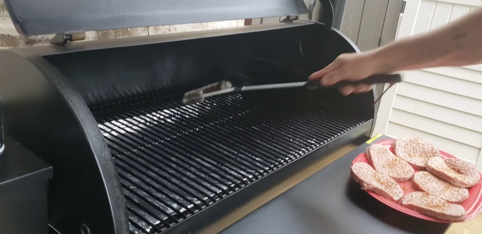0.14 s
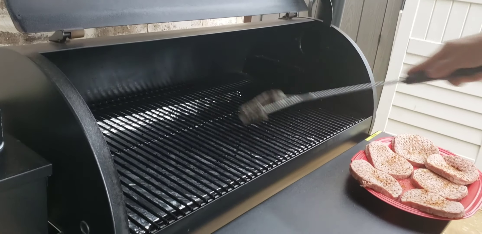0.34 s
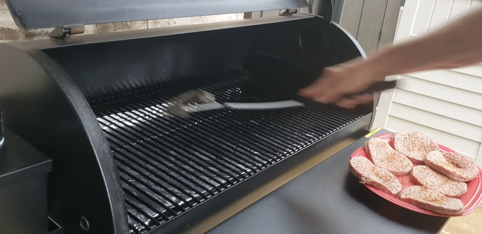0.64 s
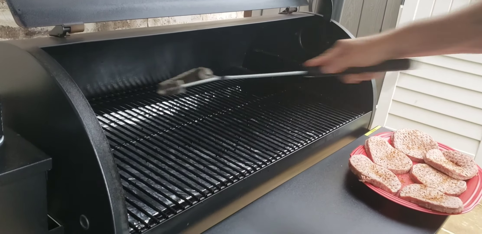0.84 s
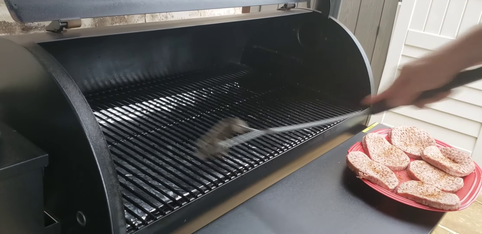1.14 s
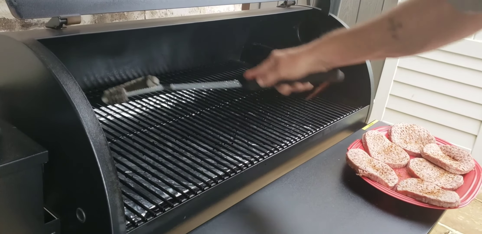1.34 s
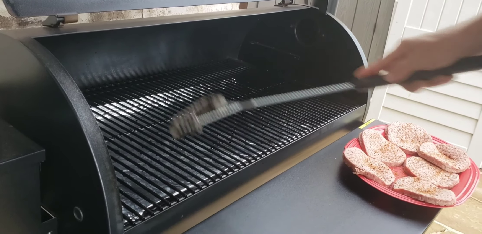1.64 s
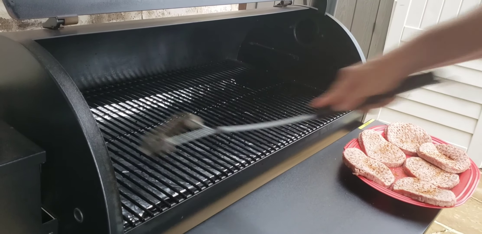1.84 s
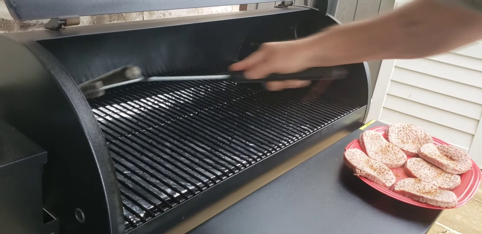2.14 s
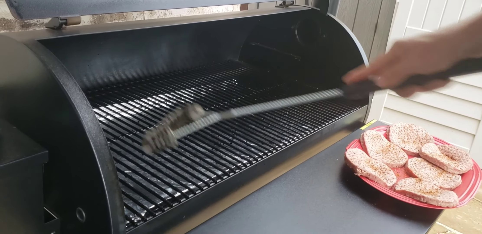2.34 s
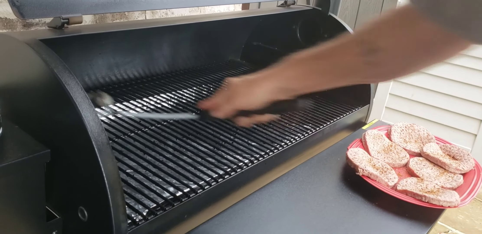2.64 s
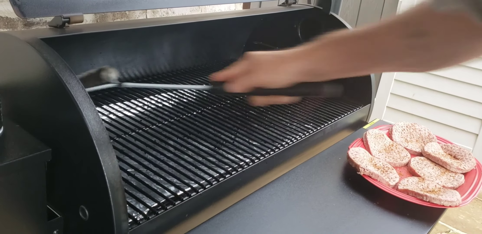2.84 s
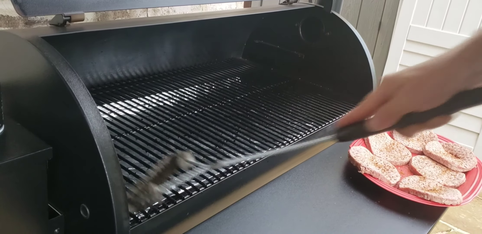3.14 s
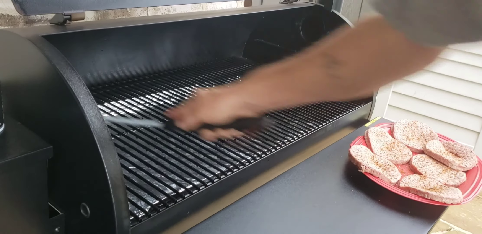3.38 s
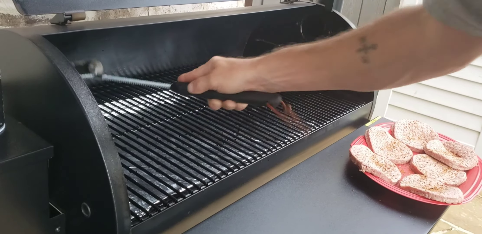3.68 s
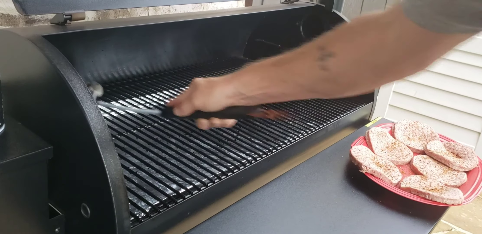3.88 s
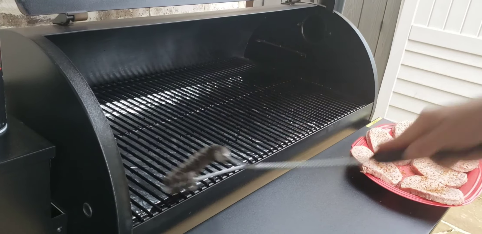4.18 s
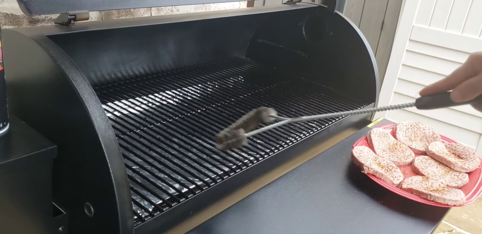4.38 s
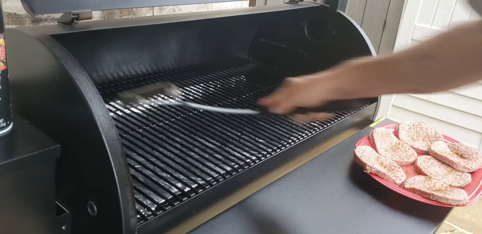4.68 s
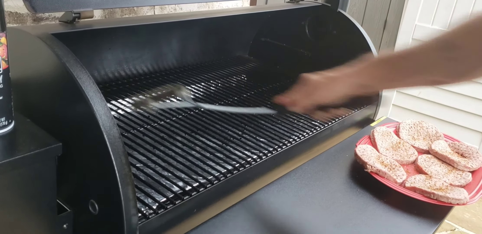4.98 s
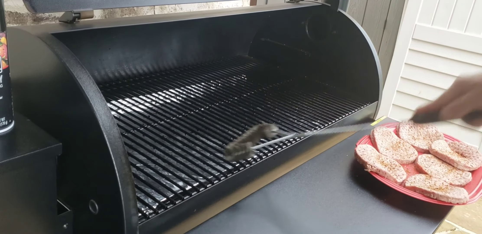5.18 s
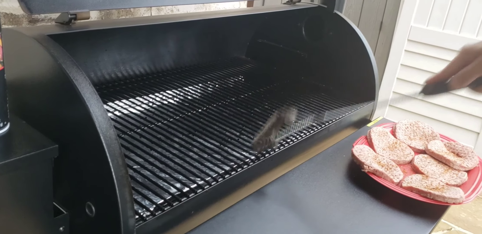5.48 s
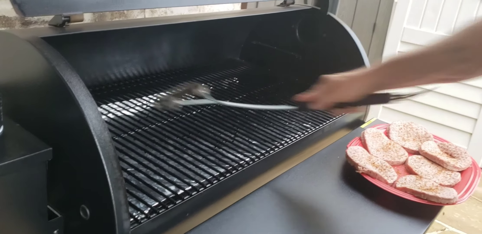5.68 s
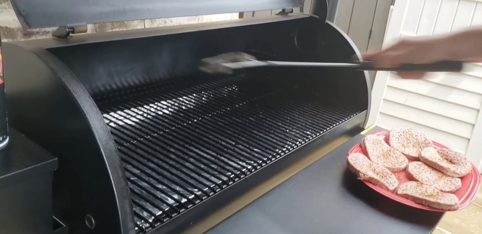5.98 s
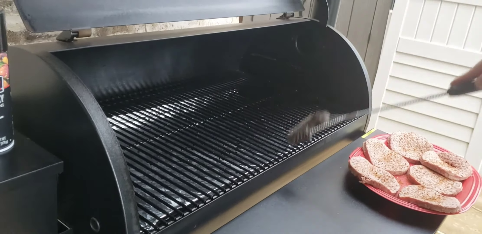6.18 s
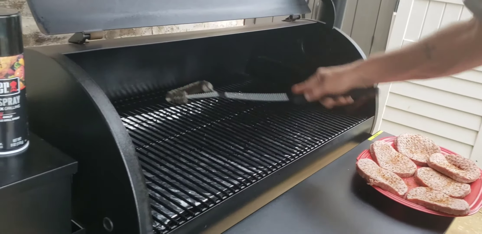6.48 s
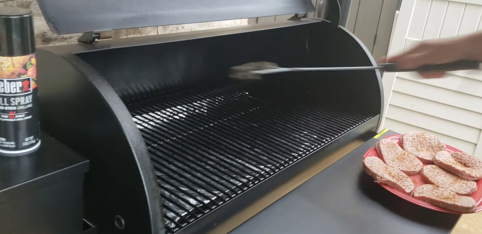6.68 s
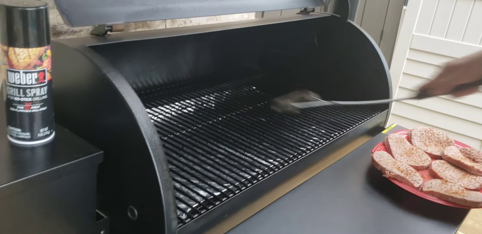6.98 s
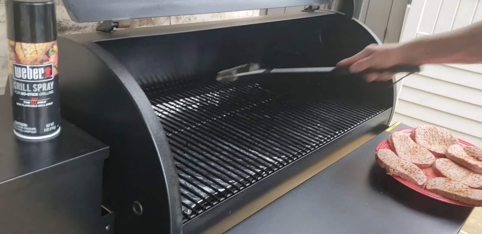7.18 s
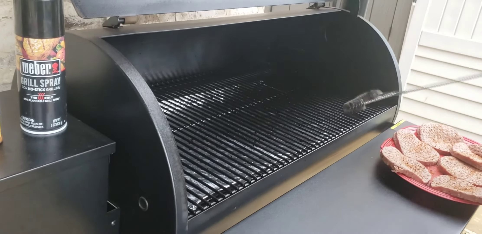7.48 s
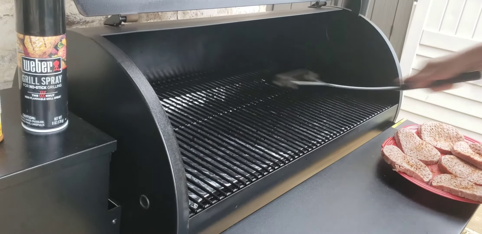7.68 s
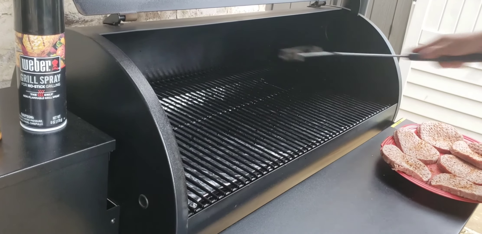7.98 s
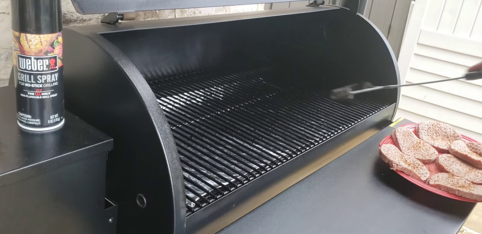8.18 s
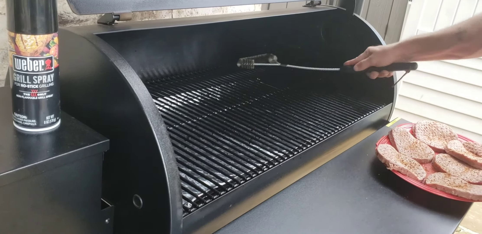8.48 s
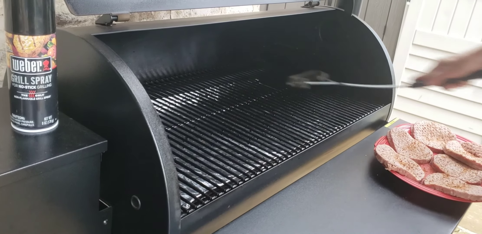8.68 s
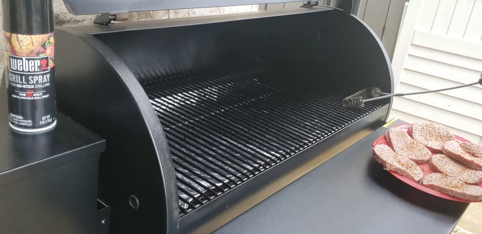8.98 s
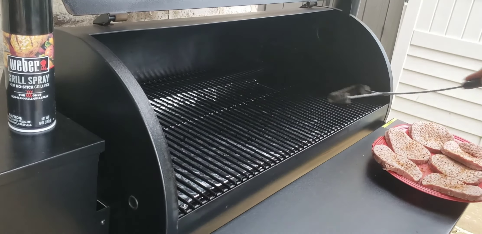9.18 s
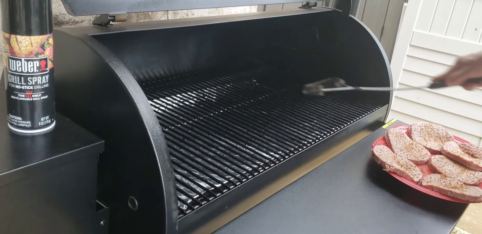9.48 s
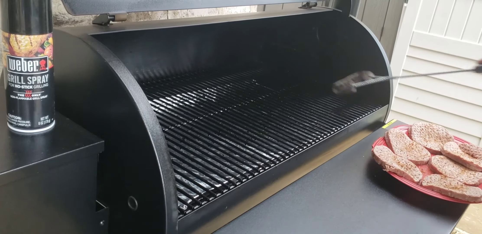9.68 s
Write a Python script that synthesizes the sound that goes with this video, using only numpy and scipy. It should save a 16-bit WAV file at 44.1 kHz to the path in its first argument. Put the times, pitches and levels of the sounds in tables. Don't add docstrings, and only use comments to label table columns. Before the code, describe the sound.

A continuous deep, hollow blower hum with soft gusts lies under repeated wire brushing on metal bars. Each stroke begins with a rattle or sharp clank, swells into a thin, gritty hiss and fades. The hardest clanks come around four and a half and five and a half seconds; later strokes are lighter and duller. Close stereo phone pickup, outdoors, low shared and wide metallic treble.

```python
import sys
import numpy as np
from scipy import signal
from scipy.fft import rfft, irfft, next_fast_len
from scipy.io import wavfile
from scipy.ndimage import uniform_filter1d

SR = 44100
rng = np.random.default_rng(int(sys.argv[2]) if len(sys.argv) > 2 else 0)


def volts_from_decibels(level):
    exponent = np.asarray(level, float) / 20
    return 10 ** exponent


def dump_mix(stems):
    frames = np.atleast_2d(stems).T
    limited = np.clip(frames, -1, 1)
    pcm = np.round(limited * 32767).astype(np.int16)
    wavfile.write(sys.argv[1], SR, pcm)


N = 433503
M = next_fast_len(N + SR // 4)
HZ = np.maximum(np.fft.rfftfreq(M, 1 / SR), 1)
T = np.arange(M) / SR

# pitch_hz, level_db
ROAR_COLOUR = [(25, -38), (45, -31.5), (90, -16.5), (160, -13), (300, -12.5), (400, -20), (600, -22.5),
               (1200, -25), (1650, -27.5), (1850, -32.5), (3200, -40.5), (5400, -45), (8000, -53),
               (9800, -60), (16000, -49)]
# pitch_hz, width_hz, level_over_roar_db
BARREL_HUMS = [(61, 13.6, 12), (119.5, 9.35, 16), (130.1, 10.4, 13.5), (204.4, 43, 4), (239.6, 20, 3),
               (310.3, 17, 6), (458.2, 26, 18), (679, 17, 4), (870, 13, 2.5), (1025, 7.1, -10),
               (1162.6, 5.8, 11), (1528, 45, 10.5), (1950, 38, 6.5), (2136, 32, 9)]
# time_s, level_db
DRAUGHT_LEVELS = [(0.0, -40), (0.13, -48), (0.19, -57), (0.41, -57), (1.45, -49), (2.63, -45), (2.82, -44),
                  (2.93, -34), (2.98, -44), (6.24, -43.5), (6.38, -57), (7.09, -47), (7.56, -57),
                  (7.64, -42.5), (9.31, -48), (9.42, -35), (9.53, -41), (9.83, -51)]
# start_s, peak_db, low_bars_db, barrel_drum_db, rattle_length_s
LANDINGS = [(0.4154, -20, 5.5, -4, 0.031), (0.465, -35, 7, 16, 0.025), (0.571, -22.5, 3, -1, 0.026),
            (1.027, -23, 0, -6, 0.04), (1.038, -15, 0, 0, 0.029), (1.087, -19.5, 2.5, -14, 0.025),
            (1.688, -28.5, 5.5, 7, 0.092), (2.402, -24, 0.5, 1, 0.053), (3.084, -32.5, 7, -23, 0.068),
            (3.707, -33, 3, 7, 0.093), (4.416, -25.5, 7.5, -15, 0.037), (4.436, -11, -4, -4, 0.02),
            (5.4387, -14.5, 3.5, -8, 0.048), (5.462, -9, -4, -19, 0.035), (5.54, -28, 7, 3, 0.049),
            (6.163, -22, 3.5, -19, 0.049), (6.186, -18, 0.5, -2.5, 0.059), (6.347, -27, 5.5, -6, 0.075),
            (6.8169, -20, 2, 0.5, 0.026), (6.866, -20.5, 3, -11, 0.035), (6.975, -29.5, 8.5, 4, 0.066),
            (7.629, -14.5, -1, -1, 0.046), (8.242, -30.5, 7, 8, 0.03), (8.275, -22, 4.5, -5, 0.021)]
# pitch_hz, width_hz, level_db
THIN_BARS = [(2150, 140, 0), (2366, 74, 1.5), (2570, 34, 0), (2836, 29, 4.5), (3090, 44, 2.5),
             (3830, 92, -29), (4520, 75, -4), (5320, 33, 0), (5490, 60, 6), (5900, 37, 0), (5920, 30, 10),
             (7360, 55, -5)]
# pitch_hz, width_hz, level_db
HEAVY_BARS = [(279, 23, -2), (323, 31, 1), (368, 18.4, 0), (555, 57, -2.5), (653, 16, -5.5),
              (765, 18.5, -4), (954, 32, -3), (1360, 9.3, -4)]
# pitch_hz, level_db
CLANG_COLOUR = [(710, -4), (1200, 8.5), (1520, 2.5), (3140, -0.5), (5340, -13), (6530, -21), (7600, -23),
                (9000, -61), (11700, -66), (19800, -120)]
# start_s, pitch_hz, peak_db, fade_60db_s
CLINKS = [
    (1.044, 5300, -27, 0.0033),
    (1.716, 2470, -32, .008),
    (2.402, 3260, -37, 0.016),
    (3.1, 3000, -37, .012),
    (3.728, 3200, -39, .012),
    (4.585, 2470, -31, 0.0041),
    (7.634, 2360, -24, .015),
    (7.665, 3030, -36, .02),
    (8.276, 2330, -25, .015),
    (8.649, 12250, -40, .05),
]
# touch_s, fastest_s, lift_s, splay_on_touching_db, slide_at_full_speed_db
STROKES = [(0.0, 0.045, 0.066, -41, -52), (.407, 0.584, 0.75, -54, -45.5), (1.009, 1.04, 1.09, -46, -39.5),
           (1.09, 1.21, 1.33, -49, -46), (1.58, 1.594, 1.66, -62, -54), (1.68, 1.853, 2.03, -42.5, -47),
           (2.39, 2.55, 2.78, -44, -49), (3.08, 3.23, 3.45, -43, -49.5), (3.318, 3.39, 3.6, -58, -51.5),
           (3.732, 4.01, 4.32, -47, -47), (4.414, 4.586, 4.85, -42, -46), (4.796, 5.02, 5.27, -60, -47.5),
           (5.431, 5.491, 6.2, -47, -52), (5.51, 5.65, 5.73, -52, -48.5), (5.66, 5.76, 5.3, -56, -58),
           (6.16, 6.35, 6.52, -54, -46), (6.64, 6.7, 6.77, -70, -56), (6.805, 7, 7.13, -51, -46),
           (7.428, 7.65, 7.83, -60, -47), (8.1, 8.277, 8.63, -64, -49.5), (8.45, 8.647, 8.95, -66, -47),
           (8.96, 9.007, 10, -59, -61), (9.07, 9.35, 9.7, -69, -53.5), (9.735, 9.759, 9.95, -60, -54)]
# start_s, peak_db, head_share_db, ring_share_db
CATCHES = [(0.0024, -29, 0.5, 1), (0.033, -36, -6, -6), (0.1905, -43, -5, -11), (0.407, -45, -4, -6),
           (0.588, -25.5, -4, -6), (0.635, -28, -10, -6), (0.9393, -38, -11, -6), (1.0136, -38, -5, -8),
           (1.1982, -34, -7, -6), (1.5953, -41, -3, -6), (1.6851, -38, -14, -6), (2.0946, -41.5, -3, -6),
           (2.3955, -37, -9, -3), (3.0844, -38, -13, -6), (3.4017, -32, -10, -9), (3.7204, -32, -6, -3),
           (4.3984, -39, -3, 0), (4.7486, -37.5, -2, -10), (5.4415, -30, 3.5, -9), (5.478, -25, 3.5, -11),
           (6.1709, -36, -15, -4), (6.3405, -27, -16, -6), (6.8074, -39, -15, -4), (7.0683, -39, -13, -1),
           (7.429, -38, -19, 8), (8.056, -35.5, -10, -8), (8.254, -24, -16, -9), (8.6492, -43, -17, -2),
           (9.6444, -51, 11, 7), (9.7507, -46, -16, -8)]
# pitch_hz, level_db
HISS_COLOUR = [(3530, -39), (6000, -17), (7460, -1.5), (8570, -13), (9940, -6.5), (11900, 1), (13400, -1.5),
               (15100, 4.5), (16000, -9)]
# pitch_hz, width_hz, level_db
WIRE_LENGTHS = [(7360, 220, -8.5), (9460, 420, -8.5), (11940, 140, -5), (12250, 130, -3.5),
                (14500, 200, -7), (14650, 220, -6), (15250, 300, -2)]
# pitch_hz, likeness_0_to_1
SIDE_LIKENESS = [(60, 1), (130, 0.98), (290, 1), (640, 0.89), (1410, 0.32), (3100, 0.15), (6820, -0.0),
                 (15000, -0.0)]
# pitch_hz, left_minus_right_db
SIDE_BALANCE = [(60, 2), (110, 0.5), (200, 2), (380, -2.5), (700, -1), (1290, 4), (2380, -3.5),
                (4400, -10.5), (8120, -4.5), (15000, 2.5)]
# pitch_hz, share_0_to_1
WALL_SHARES = [(400, 0.48), (900, 0.57), (2000, 0.026), (5000, 0.043), (12000, 0.01)]

ROAR_DB = -27
RUMBLE_FOLLOW, BOOM_FOLLOW, BOOM_SAG_DB_PER_S = 0.9, 0.099, 0.24
RATTLE_T60_S, T60_S_PER_DB = 0.26, 0.01
BRIGHT_FADE_DB_PER_S = 0.2
SPLAY_DB_PER_S, START_DB, LIFT_DB = 260, 15, 26
SPEED_UP, SLOW_DOWN = 0.87, 1.3
HEAD_DB, HEAD_FOLLOW, BAR_DB, BAR_FOLLOW = -52, 0.4, -48, 0.5
HEAD_FADE_DB_PER_S = 0.5
CATCH_T60_S = 0.14
WALL_LAG_S, PORT_LAG_S, TOP_HZ = 0.0008, 0.0001, 15800


def unit(x):
    return x / np.sqrt(np.mean(x ** 2))


def read(table):
    hz, value = np.transpose(table)
    return np.interp(np.log(HZ), np.log(np.maximum(hz, 1)), value)


def modes(table):
    return sum(volts_from_decibels(db) * 1j * HZ * w / (hz ** 2 - HZ ** 2 + 1j * HZ * w) for hz, w, db in table)


def shape(x, response):
    return rfft(x) * response / np.sqrt(np.mean(np.abs(response) ** 2))


def walk(rate):
    k = int(SR / rate)
    levels = np.repeat(rng.standard_normal(M // 200), k)[:M]
    return unit(uniform_filter1d(uniform_filter1d(levels, k), k))


def grains(rate, spread_db):
    chance = rng.random((2, 2, M), dtype=np.float32)
    size = (np.abs(2 * chance[1] - 1) + 1 / 300) ** (-spread_db * np.log(10) / 20)
    return unit((chance[0] < rate / SR) * np.sign(chance[1] - 0.5) * size)


def bursts(s, db, hold, t60, rise):
    power, t = np.zeros(M + SR), T[:SR // 3]
    for start, peak_db, length, fall in np.broadcast(s, db, hold, t60):
        k = int(max(start, 0) * SR)
        fade = volts_from_decibels(peak_db - 60 * np.clip(t - length, 0, 1) / max(fall, 0.01))
        power[k:k + len(t)] += (np.clip(t / rise, 0, 1) * fade) ** 2
    return np.sqrt(power[:M])


def roar():
    colour = volts_from_decibels(read(ROAR_COLOUR)) * np.sqrt(1 + np.abs(modes(BARREL_HUMS)) ** 2)
    air = rfft(rng.standard_normal((2, M))) * colour
    s, db = np.transpose(DRAUGHT_LEVELS)
    draught_db = np.interp(T, s, db - np.mean(db))
    rumble_db = RUMBLE_FOLLOW * draught_db
    boom_db = BOOM_FOLLOW * draught_db - BOOM_SAG_DB_PER_S * (T - T.mean())
    out = 0
    for hz, gust_db in zip((35, 130, 500, 2000, 8000), (rumble_db, boom_db, 0, 0, 0)):
        band = np.cos(np.pi / 4 * np.clip(np.log2(HZ / hz), -2, 2)) ** 2
        out = out + volts_from_decibels(gust_db + 0.8 * walk(6)) * irfft(air * band, M)
    return rfft(volts_from_decibels(ROAR_DB) * unit(out))


def panel_buzz(s, db):
    phase = 2 * np.pi * 114 * T + 0.86 * walk(6.5)
    panel = np.cos(phase) + 0.5 * np.cos(2 * phase) + 0.083 * np.cos(3 * phase)
    return rfft(panel * bursts(s + 0.03, db - 5.5, 0.41 * 0 + LANDING_HOLD(), 0.41, 0.024))


def LANDING_HOLD():
    return np.transpose(LANDINGS)[4]


def grate():
    s, db, low_db, drum_db, hold = np.transpose(LANDINGS)
    t60 = RATTLE_T60_S + T60_S_PER_DB * (db + 16)
    chatter = volts_from_decibels(1.5 * walk(60))
    clang = volts_from_decibels(read(CLANG_COLOUR))
    rattle, patter = grains(10000, 2.8), grains(12000, 3.5)

    bright_db = db - 21.5 - BRIGHT_FADE_DB_PER_S * (s - s.mean())
    bright_hits = bursts(s, bright_db, 0.6 * hold, 0.65 * t60, 0.0046)
    bright = shape(patter * chatter * bright_hits, clang * (HZ / (HZ + 4000)) ** 2)

    linger = bursts(s, db - 26.5, hold, 2.1 * t60, 0.022)
    bar_hits = np.hypot(bursts(s, db - 14, hold, 0.63 * t60, 0.0069), linger)
    bar_ring = np.hypot(1, np.abs(volts_from_decibels(9.5) * modes(THIN_BARS)))
    bars = shape(rattle * chatter * bar_hits, clang * bar_ring / (1 + (HZ / 3000) ** 2))

    frame_hits = bursts(s, db + low_db - 9.5, hold, 1.5 * t60, 0.012)
    frame_ring = modes(HEAVY_BARS) / (1 + (HZ / 1800) ** 4)
    frame = shape(grains(4000, 3.0) * chatter * frame_hits, frame_ring)
    return bright + bars + frame + panel_buzz(s, db + drum_db)


def clinks():
    out, t = np.zeros((2, M)), T[:SR // 5]
    for s, hz, db, t60 in CLINKS:
        taps = rng.standard_normal((2, len(t))) * np.exp(-t / 0.027)
        tone = np.sin(2 * np.pi * hz * t) * volts_from_decibels(-60 * t / t60)
        ring = signal.fftconvolve(taps, tone[None], axes=1)[:, :len(t)]
        out[:, int(s * SR):][:, :len(t)] += volts_from_decibels(db) * ring / np.abs(ring).max(axis=1, keepdims=True)
    return rfft(out)


def contact():
    power, touch = np.full(M, 1e-12), np.zeros(M)
    for start, fastest, lift, splay_db, slide_db in STROKES:
        on = slice(int(max(start, 0) * SR), int(lift * SR))
        before = np.clip((fastest - T[on]) / (fastest - start), 0, 1)
        after = np.clip((T[on] - fastest) / (lift - fastest), 0, 1)
        slide = volts_from_decibels(slide_db - START_DB * before ** SPEED_UP - LIFT_DB * after ** SLOW_DOWN)
        splay = volts_from_decibels(splay_db - SPLAY_DB_PER_S * (T[on] - start))
        power[on] += slide ** 2 + splay ** 2
        touch[on] = 1
    return 10 * np.log10(power), uniform_filter1d(touch, size=130)


def wires(drive, sharp):
    out, plucks = 0, grains(5000, 3.6)
    for hz, width, db in WIRE_LENGTHS:
        radius = np.exp(-np.pi * width / SR)
        swell = volts_from_decibels(db) * np.hypot(volts_from_decibels(5.0 * walk(22)) * drive, sharp)
        feedback = [1, -2 * radius * np.cos(2 * np.pi * hz / SR), radius ** 2]
        out = out + np.sqrt(width / SR) * signal.lfilter([1, 0, -1], feedback, plucks * swell)
    return rfft(out)


def bristles():
    hiss_db, touch = contact()
    press = touch * volts_from_decibels(hiss_db) * volts_from_decibels(0.87 * walk(43))
    s, db, body_db, ring_db = np.transpose(CATCHES)
    t60 = CATCH_T60_S

    tips = np.hypot(volts_from_decibels(-2.0) * press, bursts(s, db - 13.0, 0.0096, t60, 0.0035))
    hiss = shape(grains(10000, 3.4) * tips, volts_from_decibels(read(HISS_COLOUR)))
    ringing = wires(volts_from_decibels(-5) * press, bursts(s, db + ring_db - 18, 0.009, t60, 0.007))

    drag = grains(10000, 3.0)
    head_db = HEAD_DB + HEAD_FOLLOW * (hiss_db + 50.5) - HEAD_FADE_DB_PER_S * (T - T.mean())
    head_hits = bursts(s, db + body_db - 10.5, 0.0074, t60, 0.0022)
    head_drive = np.hypot(volts_from_decibels(-5) * touch * volts_from_decibels(head_db), head_hits)
    head_ring = modes([(4430, 1000, 0), (5330, 1800, 4.5), (7470, 620, -2.5)]) ** 2
    head = shape(drag * head_drive, head_ring)

    bar_drive = volts_from_decibels(-6.5) * touch * volts_from_decibels(BAR_DB + BAR_FOLLOW * (hiss_db + 54.5))
    bar_ring = modes([(2310, 950, 0.88), (2650, 420, -0.15), (2930, 250, -2.8)]) ** 2
    bars = shape(drag[:, ::-1] * bar_drive, bar_ring)
    return hiss + ringing + head + bars


def scene():
    first, second = roar() + grate() + clinks() + bristles()
    like = np.clip(read(SIDE_LIKENESS), 0, 1)
    early = np.clip(read(WALL_SHARES), 0, 1) * np.sqrt(1 - like ** 2)
    shared = like + early * np.exp(2j * np.pi * HZ * WALL_LAG_S)
    own = np.sqrt(1 - like ** 2 - early ** 2)
    balance_db = read(SIDE_BALANCE) / 2
    right = (shared * first + own * second) * volts_from_decibels(-balance_db)
    left = first * volts_from_decibels(balance_db) * np.exp(2j * np.pi * HZ * PORT_LAG_S)
    return irfft(np.array([left, right]) * np.sqrt(2 / (1 + like)), M)[:, :N]


def band_limit(x):
    return signal.sosfilt(signal.butter(12, 17090, fs=SR, output="sos"), x)


def record(dry):
    mix = irfft(rfft(dry, M) * (HZ < TOP_HZ), M)[:, :N]
    return band_limit(mix)


dry = scene()
out = record(dry)
dump_mix(out)
```